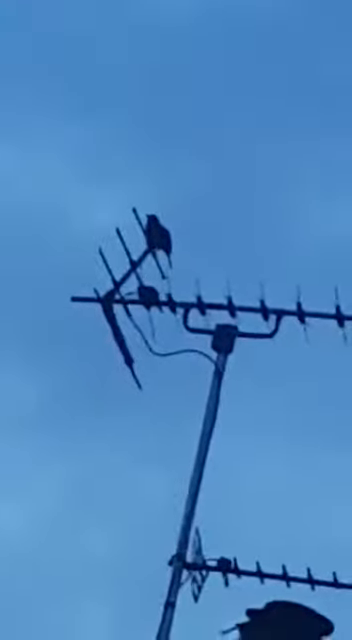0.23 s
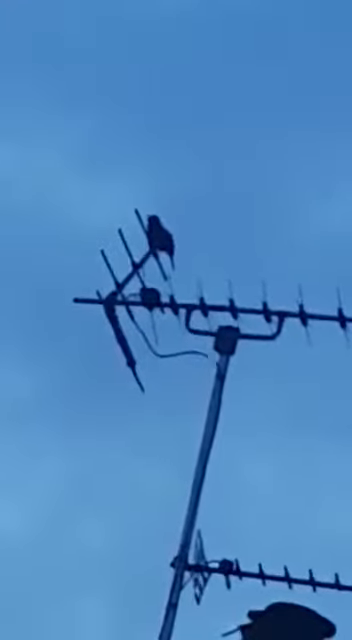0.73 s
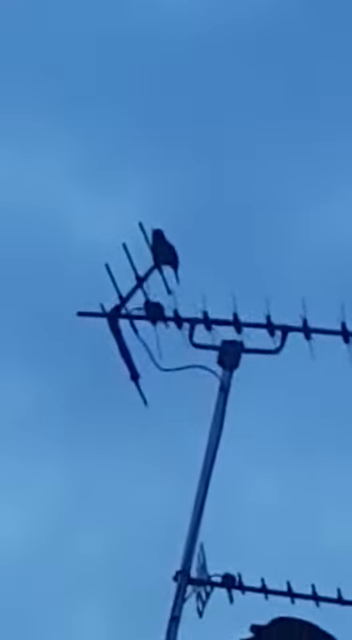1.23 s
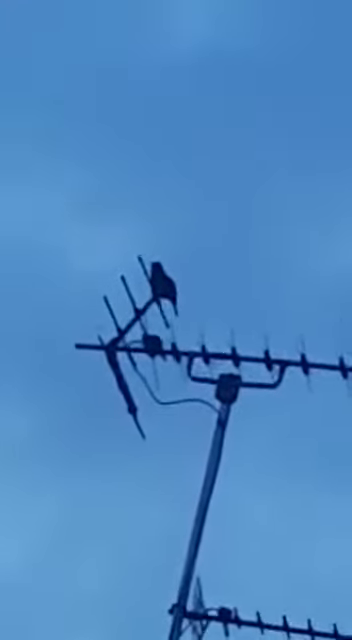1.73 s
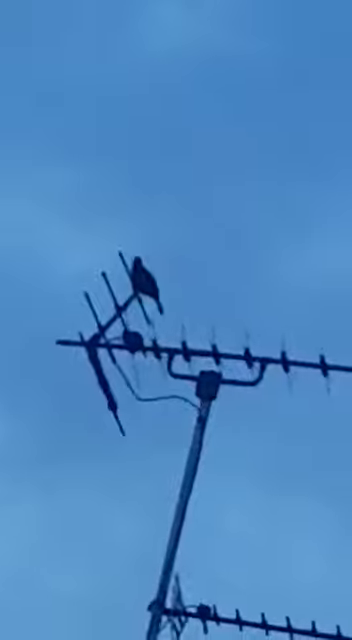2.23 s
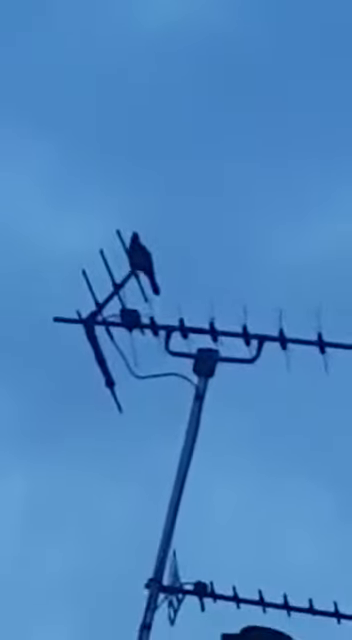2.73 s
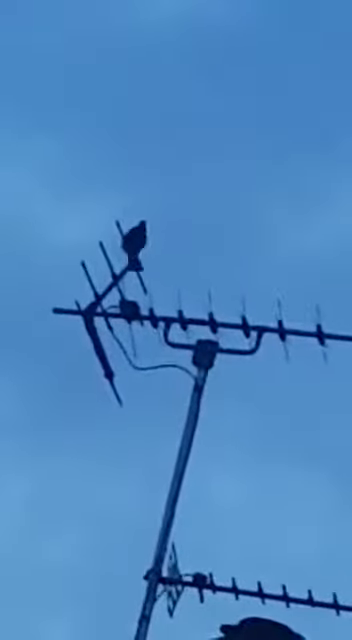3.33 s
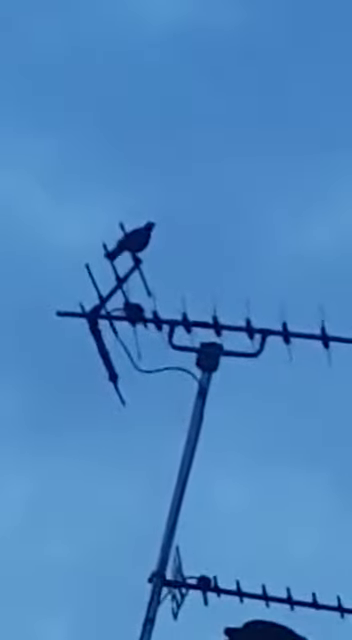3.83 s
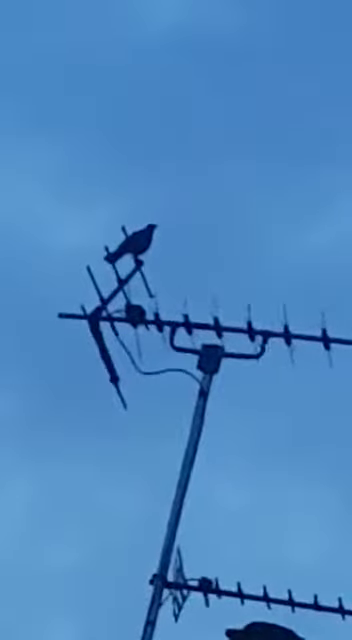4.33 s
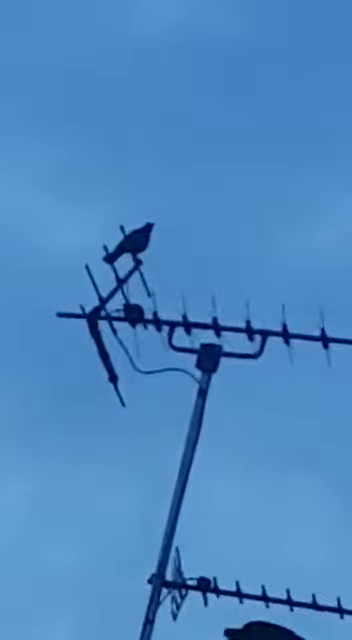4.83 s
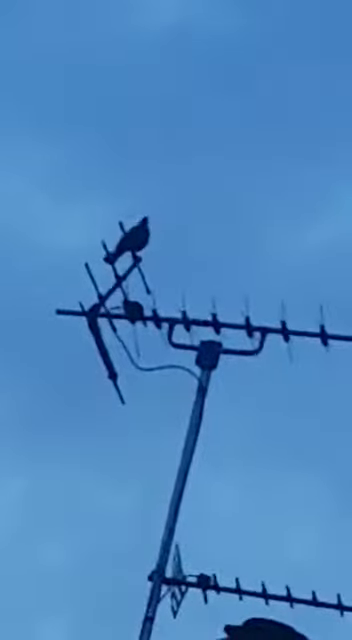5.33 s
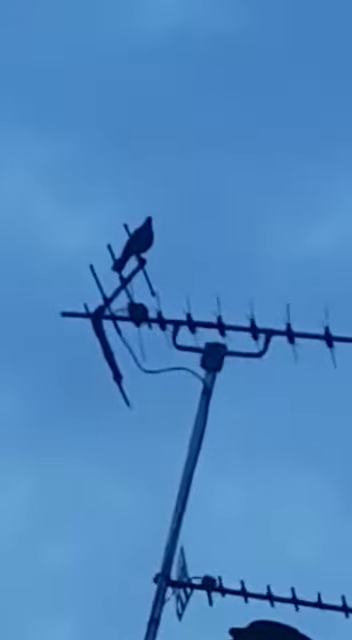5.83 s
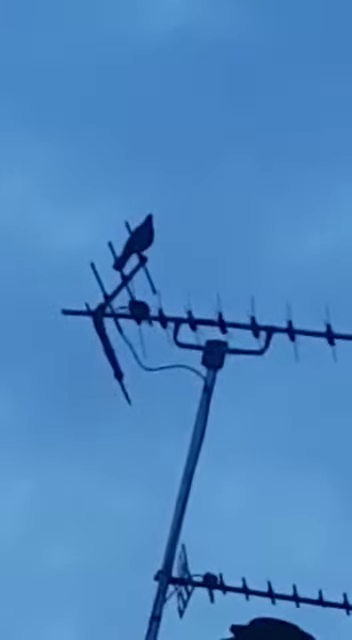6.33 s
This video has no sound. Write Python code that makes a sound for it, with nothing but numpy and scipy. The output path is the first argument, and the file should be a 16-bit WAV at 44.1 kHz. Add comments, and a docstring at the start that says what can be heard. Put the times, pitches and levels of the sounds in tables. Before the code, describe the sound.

Outdoors at dawn, a blackbird on a roof aerial sings clear, sliding fluted whistles, then thin buzzes, a sharp high note, harsh rasps and a faint high twitter. After a short pause a new mellow phrase begins. House walls return smeared echoes, a distant bird answers briefly, and very quiet traffic rumble and a wavering low hum lie beneath. One soft knock touches the microphone early on.

```python
"""The wash of a town and a faint low hum come first; half a second in, a blackbird on a roof aerial sings at dawn.
Its fluted notes give way to a thin high twitter, a pause and a new phrase: unsteady whistles swept in pitch.
House walls throw the song back as smeared echoes; a far bird, some gardens away, answers with short level notes.
The town is shaped noise, the hum one wavering tone, and one soft knock comes from a hand at the microphone.
Two microphone ports hear it in stereo, with a hollow in the treble and a limit at the top."""
import sys
import numpy as np
from scipy import signal
from scipy.fft import rfft, irfft
from scipy.io import wavfile
from scipy.ndimage import uniform_filter1d

SR = 44100
rng = np.random.default_rng(int(sys.argv[2]) if len(sys.argv) > 2 else 0)


def digitize_waveform(pressure):
    """Quantize a signal to 16-bit integers and store it at the path in sys.argv[1].

    Rows of a 2-D input are taken as channels; values are limited to [-1, 1].
    """
    field = np.atleast_2d(pressure).T
    bounded = np.clip(field, -1, 1)
    quanta = np.round(bounded * 32767).astype(np.int16)
    wavfile.write(sys.argv[1], SR, quanta)


N = 290178


def amp(db):
    """Decibels to amplitude."""
    return 10 ** (np.asarray(db) / 20)


def evened(x):
    """Scales a signal to rms 1 over all its channels."""
    return x / np.sqrt(np.mean(x ** 2) + 1e-20)


def read(points, hz):
    """A table read on a log-frequency axis."""
    f, value = np.transpose(points)
    return np.interp(np.log(hz + 1), np.log(f + 1), value)


def add(mix, s, sound):
    """Lays a sound into the mix at s seconds, cut off where the mix ends."""
    part = mix[round(s * SR):][:len(sound)]
    part += sound[:len(part)]


def drift(size, hz):
    """Smooth chance of about rms 1; its spectrum fades out around hz."""
    f = np.fft.rfftfreq(size + SR, 1 / SR)
    spectrum = rfft(rng.standard_normal(size + SR)) * np.exp(-(f / hz) ** 2)
    return evened(irfft(spectrum))[:size]


def panned(pair, side):
    """Tilts each band to the left or right."""
    side_db = read(side, np.fft.rfftfreq(N, 1 / SR))
    return irfft(rfft(pair) * amp(np.array([side_db, -side_db]) / 2), N)


def dipped(x, dip):
    """A bell-shaped hollow in the spectrum."""
    centre_hz, width_hz, depth_db = dip
    hz = np.fft.rfftfreq(N, 1 / SR)
    return irfft(rfft(x) * amp(depth_db * np.exp(-((hz - centre_hz) / width_hz) ** 2)), N)


# spectrum of the distant traffic: [f/Hz, relative level/dB per Hz]
TRAFFIC_SPECTRUM = [(15, -43), (25, -9.5), (58, 0), (224, -5.5), (256, -7), (289, -9), (399, -10),
                    (457, -15), (589, -13), (842, -12.5), (964, -10), (1240, -13.5), (1450, -16.5),
                    (1880, -45.5), (3190, -120)]
# traffic over time, before the trims in town(): [t/s, rumble level/dB, wash level/dB]
TRAFFIC_LEVEL = [(0.0, -66, -66), (0.88, -60, -62), (1.43, -62, -62), (2.36, -60, -62), (4.16, -63, -66),
                 (5.0, -64, -65), (5.52, -72, -63), (6.07, -69, -61), (6.58, -72, -64)]
# spectrum of the faint hiss on top: [f/Hz, relative level/dB per Hz]
HISS_SPECTRUM = [(820, -30.5), (1400, -7.5), (2070, -13), (2200, -16.5), (2750, -12.5), (3570, -23.5),
                 (4500, -23), (5130, -28.5), (15500, -24.5)]
HISS_DB = -68.5
# likeness of the two ports: [f/Hz, left-right correlation]
TOWN_SAME = [(60, 0.91), (180, 0.8), (550, 0.76), (1650, 0.22), (4970, 0), (15000, 0.022)]
# lean of the town to one port: [f/Hz, left minus right level/dB]
TOWN_SIDE = [(60, -1.5), (180, -2), (550, 0), (1650, -5), (4970, -1), (15000, 0.5)]


def town(rumble_db=-.8, wash_db=1.2):
    """Distant traffic: a lumpy rumble and a smooth wash, under steady faint hiss."""
    hz, t = np.fft.rfftfreq(N, 1 / SR), np.arange(N) / SR
    a, b = rfft(rng.standard_normal((2, N)))
    same = np.clip(read(TOWN_SAME, hz), -1, 1)
    noise = np.array([a, same * a + np.sqrt(1 - same ** 2) * b])
    # the rumble lies below about 320 Hz, the hiss above about 1400 Hz, the wash between
    low = 1 / (1 + (hz / 320) ** 6)
    high = 1 / (1 + (1400 / (hz + 1)) ** 12)
    traffic = noise * amp(read(TRAFFIC_SPECTRUM, hz)) * np.sqrt(1 - high)
    s, rumble_curve, wash_curve = np.transpose(TRAFFIC_LEVEL)
    rumble = evened(irfft(traffic * low, N)) * amp(np.interp(t, s, rumble_curve) + rumble_db)
    wash = evened(irfft(traffic * (1 - low), N)) * amp(np.interp(t, s, wash_curve) + wash_db)
    hiss = evened(irfft(noise * amp(read(HISS_SPECTRUM, hz)) * high, N)) * amp(HISS_DB)
    return panned(rumble + wash + hiss, TOWN_SIDE)


HUM_HZ, HUM_DB = 259, -69.5  # centre of the wavering pitch; level before its fade and waver


def hum(waver=.0057, waver_db=2.5):
    """A far machine drones on one tone, wavering in pitch (share) and level."""
    phase = 2 * np.pi * np.cumsum(HUM_HZ * (1 + waver * drift(N, 7.9))) / SR
    # the drone swells slightly, then sinks away
    fade_db = np.interp(np.arange(N) / SR, [0, 3, 6], [-.5, 2.5, -8])
    return np.sqrt(2) * amp(HUM_DB + fade_db + waver_db * drift(N, 4)) * np.sin(phase)


BUMP_S, BUMP_DB = .825, -41  # start, and level before the decay


def bump(decay_s=.0081, body_hz=78, body_db=-2, ring_s=.02):
    """One soft knock of a hand at the microphone: a dull noise tap and a short, decaying low tone."""
    t, out = np.arange(SR // 6) / SR, np.zeros(N)
    tap_band = signal.butter(1, [90, 300], "band", fs=SR, output="sos")
    tap = signal.sosfilt(tap_band, rng.standard_normal(len(t)))
    tap = evened(uniform_filter1d(tap, size=45)) * np.exp(-t / decay_s)
    thud = amp(body_db) * np.sin(2 * np.pi * body_hz * t) * np.exp(-t / ring_s)
    add(out, BUMP_S, amp(BUMP_DB) * (tap + thud))
    return out


# overtones of the fluted and of the thin, open-beaked voice: [multiple of the pitch, level/dB]
FLUTE_TONE = [(1, -1.5), (2, -44.5), (3, -43.5), (4, -79), (5, -47), (6, -47.5)]
THIN_TONE = [(1, -3.5), (2, -21.5), (3, -27)]


def syrinx(hz, db, tone, jitter=.003, flutter_db=1.0, coding_db=-46, overtone_db=4):
    """An unsteady whistle: jittering pitch, flickering overtones, a little coding noise around the tone."""
    size = len(hz)
    hz = hz * (1 + jitter * drift(size, 200))
    phase = 2 * np.pi * np.cumsum(hz) / SR
    wave = amp(coding_db) * signal.lfilter([1], [1, -.3], rng.standard_normal(size))
    for k, level in tone:
        flicker = overtone_db * drift(size, 36) * (k != 1)  # the fundamental stays steady
        audible = k * hz < SR / 2
        wave += np.sqrt(2) * amp(level + flicker) * audible * np.sin(k * phase)
    edges = signal.windows.tukey(size, min(1, .006 * SR / size))
    return wave * amp(db + flutter_db * drift(size, 100)) * edges


# the far bird's notes, level before the overtone weights: [t/s, length/s, f/Hz, level/dB]
FAR_NOTES = [(4.013, 0.061, 2784, -63.5), (4.152, 0.049, 2224, -60), (4.24, 0.037, 2240, -63),
             (4.274, 0.062, 2768, -61), (5.175, .06, 2235, -67.5), (5.33, 0.065, 2230, -64.5)]


def far_bird():
    """Short level whistles from some gardens away."""
    song = np.zeros(N)
    for s, length, hz, db in FAR_NOTES:
        add(song, s, syrinx(np.full(round(length * SR), hz), db, FLUTE_TONE, jitter=.014))
    return song


# echoes off the roof and house walls: [delay t/s, level/dB]
WALLS = [(.007, -17.5), (.052, -22.5), (.098, -16), (.112, -19.5), (.192, -20.5), (.3, -36)]
# dying away of the scattered tail: [f/Hz, t60/s]
STREET_T60 = [(1500, 2.64), (2500, 1.105), (4000, 2.33), (7000, 0.87), (14000, 0.13)]
# lean of the echoes to one port: [f/Hz, left minus right level/dB]
STREET_SIDE = [(2000, -7), (2800, -6), (4000, -0.5), (10000, 6)]


def street(x, tail_db=-15, build_s=.025, scatter=.14):
    """Distinct, slightly smeared wall echoes and a thin tail scattered by roofs and trees."""
    t = np.arange(SR + SR // 2) / SR
    hits = rng.random((2, len(t))) < 2000 / SR  # about 2000 reflections per second
    taps = rng.standard_normal((2, len(t))) * hits
    hz, s, bands = signal.stft(taps, SR, nperseg=256)
    decay = amp(-60 * s / read(STREET_T60, hz)[:, None])
    tail = signal.istft(bands * decay * (1 - np.exp(-s / build_s)), SR, nperseg=256)[1]
    tail *= amp(tail_db) / np.linalg.norm(tail[0])
    for delay, db in WALLS:
        for side in tail:
            echo = scatter * rng.standard_normal(1500) * np.exp(-t[:1500] / .006)
            echo[0] = 1
            # rough brick dulls the echo
            dull = uniform_filter1d(echo / np.linalg.norm(echo), size=3, mode="constant")
            add(side, delay, amp(db) * dull)
    return panned(signal.fftconvolve(x[None], tail, axes=1)[:, :N], STREET_SIDE)


# the roof's reflection cancels parts of the direct sound: [f/Hz, width/Hz, level/dB]
ROOF_NOTCHES = [(2880, 190, -11), (3720, 260, -5)]
# phase of the bird at the two ports: [f/Hz, lead of the left/rad]
BIRD_LEAD = [(1800, -.4), (2200, .2), (2600, 1.1), (2900, 1.7), (3700, -1.2), (5200, .4), (7000, 1.1)]
# lean of the bird to one port: [f/Hz, left minus right level/dB]
BIRD_SIDE = [(1800, -2), (2300, -4), (2850, -2), (3650, 11), (4400, 1), (5200, 0), (6800, 5), (13000, 9)]


def direct(x):
    """The straight path from the aerial to the two microphone ports."""
    for notch in ROOF_NOTCHES:
        x = dipped(x, notch)
    lead = read(BIRD_LEAD, np.fft.rfftfreq(N, 1 / SR))
    turned = rfft(x) * np.exp(.5j * np.array([lead, -lead]))
    return panned(irfft(turned, N), BIRD_SIDE)


ONSET_DB, FALL_ATTACK_S = -12, .013  # fluted notes swell from this far down; swell time of a fall
RELEASE_S, RELEASE_DB, RELEASE_SAG = .004, -7, .045  # as the pressure goes, level and pitch (share) drop


def blown(t, hz, db, attack_s):
    """One push of air: the note swells in, holds, and sags in pitch and level as it is let go."""
    letting_go = np.exp((t - t[-1]) / RELEASE_S)
    swell_db = ONSET_DB * np.exp((t[0] - t) / attack_s)
    return hz * (1 - RELEASE_SAG * letting_go), db + swell_db + RELEASE_DB * letting_go


# notes that bow up and come down, level before swell and release: [start t/s, top t/s, end t/s,
# start f/Hz, top f/Hz, end f/Hz, bow from 1 pointed to 2.5 rounded, level/dB, attack/s]
ARCHES = [ (1.615, 1.635, 1.68, 1910, 1955, 1882, 1.5, -33, .024),
          (1.754, 1.785, 1.846, 2030, 2150, 1720, 1.8, -30, .005),
          (2.631, 2.633, 2.65, 3650, 3650, 1900, 1.4, -46, .002),
          (4.147, 4.16, 4.187, 1944, 2284, 1830, 1.2, -56, .008),
          (4.193, 4.201, 4.202, 2200, 6300, 6300, 1, -44.5, .001),
          (4.2, 4.22, 4.232, 6400, 7550, 7560, 2.5, -54, .001),
          (4.356, 4.358, 4.377, 7460, 7460, 3040, 1.4, -55, .001),
          (5.462, 5.495, 5.502, 2500, 3000, 2980, 1, -52, .005),
          (5.48, 5.6, 5.75, 1470, 1605, 1530, 1.2, -55.5, .015),
          (5.575, 5.6, 5.622, 1580, 1615, 1590, 2, -44, .012),
          (5.932, 5.962, 5.995, 2240, 2340, 1997, 2.4, -25, .004),
          (5.992, 6.03, 6.053, 1997, 2250, 2225, 2, -28, .011)]


def arch(start, top, end, start_hz, top_hz, end_hz, bow, db, attack_s):
    """Pitch and level of a note that bows up to its top and down again."""
    t = np.arange(start, end, 1 / SR)
    away = np.interp(t, [start, top, end], [1, 0, 1]) ** bow
    foot_hz = np.where(t < top, start_hz, end_hz)
    return blown(t, top_hz + (foot_hz - top_hz) * away, db, attack_s)


# notes that climb to a top and sink to rest, levels before swell and release: [start t/s, top t/s, end t/s,
# top f/Hz, resting f/Hz, sinking time/s, shoulder from 1 sharp to 2 round, start level/dB, end level/dB]
FALLS = [ (.759, .923, 1.023, 2920, 2240, .09, 1.7, -31, -28),
         (1.332, 1.346, 1.45, 2560, 1950, .048, 1.3, -28, -33.5),
         (2.494, 2.495, 2.638, 4880, 3630, .029, 1.9, -31, -41.5),
         (3.178, 3.185, 3.395, 7520, 6200, .11, .9, -53, -47.5),
         (3.19, 3.192, 3.36, 2650, 2300, .06, 1.5, -61, -65),
         (3.452, 3.453, 3.497, 5830, 5440, .012, 1, -53, -55),
         (5.675, 5.683, 5.803, 2203, 1675, .048, 2, -30.5, -40),
         (5.685, 5.69, 5.74, 2580, 2250, .035, 2, -48, -57)]


def fall(start, top, end, top_hz, rest_hz, sink_s, shoulder, start_db, end_db):
    """Pitch and level of a note whose tension peaks at the top and relaxes towards rest."""
    t = np.arange(start, end, 1 / SR)
    tension = np.exp(-abs((t - top) / sink_s) ** shoulder)
    level = np.linspace(start_db, end_db, len(t))
    return blown(t, rest_hz + (top_hz - rest_hz) * tension, level, FALL_ATTACK_S)


# notes that settle low, then leap high, levels before swell and release: [start t/s, leap t/s, end t/s,
# start f/Hz, low f/Hz, high f/Hz, low level/dB, high level/dB, attack/s]
LEAPS = [ (1.941, 2.012, 2.171, 2290, 2050, 2410, -32.5, -26, .002),
         (6.205, 6.334, 6.407, 1640, 1900, 2500, -33.8, -28.8, .018),
         (6.469, 6.539, 6.579, 1860, 1965, 2560, -34, -29.5, .008)]
SETTLE_S, LEAP_S = .019, .005  # how fast the pitch finds the low tone, and crosses to the high one
HIGH_BOW_HZ = 30  # the high tone bows from this far below its pitch to this far above in its middle


def leap(start, leap_at, end, start_hz, low_hz, high_hz, low_db, high_db, attack_s):
    """Pitch and level of a note that holds a low tone and jumps to a louder, gently bowed high one."""
    t = np.arange(start, end, 1 / SR)
    up = 1 / (1 + np.exp((leap_at - t) / LEAP_S))
    high = high_hz + HIGH_BOW_HZ * (1 - 2 * np.interp(t, [leap_at, end], [-1, 1]) ** 2)
    low = low_hz + (start_hz - low_hz) * np.exp((start - t) / SETTLE_S)
    return blown(t, low + (high - low) * up, low_db + (high_db - low_db) * up, attack_s)


# start and end of the open-beaked stretch, where notes are thin: [t/s, t/s]
OPEN_BEAK = (2.2, 4.5)


def fluted_notes():
    """Arches, falls and leaps: nearly pure, but thin with the beak open, with more coding noise around them."""
    song = np.zeros(N)
    for shape, notes in (arch, ARCHES), (fall, FALLS), (leap, LEAPS):
        for row in notes:
            pitch, level = shape(*row)
            if OPEN_BEAK[0] < row[0] < OPEN_BEAK[1]:
                note = syrinx(pitch, level, THIN_TONE, jitter=.004, coding_db=-27)
            else:
                note = syrinx(pitch, level, FLUTE_TONE, jitter=.0035, flutter_db=1.1, coding_db=-45.5,
                              overtone_db=3)
            add(song, row[0], note)
    return song


def trill(start, end, crest, hz0, hz1, swing_hz, rate, db0, db1, dip_db,
          cusp=.18, lean=.15, uneven=.15, narrow=.3, upstroke_db=0):
    """Pitch jumps to sharp crests and slides into round troughs (a negative swing inverts it), unevenly."""
    t = np.arange(start, end, 1 / SR)
    angle = 2 * np.pi * rate * (t - crest)
    # widest in mid-trill
    width = 1 - narrow * np.linspace(-1, 1, len(t)) ** 2 + uneven * drift(len(t), 30)
    swing = (np.cos(angle) + cusp * np.cos(2 * angle) - lean * np.sin(2 * angle)) * width
    db = np.linspace(db0, db1, len(t)) - dip_db * swing - upstroke_db * np.sin(angle)
    return np.linspace(hz0, hz1, len(t)) + swing_hz * swing, db


# slow fluted trills: [start t/s, end t/s, first crest t/s, centre f/Hz at start, centre f/Hz at end,
# nominal swing/Hz, swings per s, start level/dB, end level/dB, dip/dB on each crest], before the soft ends
WARBLES = [ (.523, .694, .534, 1980, 1975, 235, 31, -46.5, -38.5, -.5),
           (1.085, 1.265, 1.098, 1805, 1788, 55, 31.7, -37.8, -37.8, -3.5),
           (1.679, 1.757, 1.682, 2040, 2200, 390, 46, -37, -35.5, 2),
           (5.893, 5.938, 5.9, 2240, 2240, 40, 68, -36.5, -29, -4)]
WARBLE_ENDS_DB = -5  # a warble is softer as it starts and stops


def warbles():
    """The whistle swings slowly about its pitch, in the fluted voice."""
    song = np.zeros(N)
    for row in WARBLES:
        pitch, level = trill(*row, cusp=.27)
        level = level + WARBLE_ENDS_DB * np.linspace(-1, 1, len(level)) ** 4
        add(song, row[0], syrinx(pitch, level, FLUTE_TONE, jitter=.0068, flutter_db=2.2, coding_db=-38))
    return song


# three high pairs, then a long low one and its fainter echo off a wall; middle pitch,
# level before dips and soft ends: [start t/s, length/s, f/Hz, level/dB]
BUZZES = [(2.255, .024, 4810, -43), (2.283, .022, 4920, -42), (2.339, .022, 5030, -45.5),
          (2.363, .026, 5170, -43), (2.42, .026, 5130, -47.5), (2.449, .03, 5170, -44),
          (3.47, .103, 3780, -41.5), (3.56, .1, 3800, -50.5)]
BUZZ_SWING_HZ, BUZZ_PER_S, BUZZ_DIP_DB = 170, 140, 4.5
BUZZ_RISE_HZ_PER_S, BUZZ_ENDS_DB = 2500, -12  # a buzz creeps upward and is loudest in its middle


def buzz(start, length, hz, db):
    """Pitch and level of a very fast, shallow trill that swells and fades."""
    rise = BUZZ_RISE_HZ_PER_S * length / 2
    pitch, level = trill(start, start + length, start, hz - rise, hz + rise,
                         BUZZ_SWING_HZ, BUZZ_PER_S, db, db, BUZZ_DIP_DB)
    return pitch, level + BUZZ_ENDS_DB * np.linspace(-1, 1, len(level)) ** 2


def buzzes():
    """The buzzes, and the echo of the last, in the thin voice."""
    song = np.zeros(N)
    for row in BUZZES:
        add(song, row[0], syrinx(*buzz(*row), THIN_TONE, jitter=.005, coding_db=-27))
    return song


CREST_S = .004  # a twitter or rasp reaches its first crest this soon
# high zigzag trills, level before the dips: [start t/s, end t/s, centre f/Hz at start, centre f/Hz at end,
# nominal swing/Hz, level/dB]
TWITTERS = [ (3.746, 3.804, 7400, 6540, 1150, -53.5), (3.814, 3.854, 7850, 7150, 1200, -54),
            (3.938, 3.996, 7300, 6750, 1150, -51), (4.011, 4.073, 8100, 5600, 1700, -53.5),
            (4.3, 4.359, 7140, 6840, -650, -53)]
TWITTER_PER_S, TWITTER_DIP_DB = 46.5, 2.5


def twitters():
    """The pitch zigzags widely, high up, in the thin voice."""
    song = np.zeros(N)
    for start, end, hz0, hz1, swing_hz, db in TWITTERS:
        zigzag = trill(start, end, start + CREST_S, hz0, hz1, swing_hz, TWITTER_PER_S,
                       db, db, TWITTER_DIP_DB, upstroke_db=-3)
        add(song, start, syrinx(*zigzag, THIN_TONE, jitter=.0074, coding_db=-22.5))
    return song


# overtones and undertones of the rasps: [multiple of the pitch, level/dB]
RASP_TONE = [(1 / 3, -31), (2 / 3, -12), (1, 0), (4 / 3, -15), (5 / 3, -24), (2, -17), (7 / 3, -24),
             (8 / 3, -25), (3, -24)]
# the nasal lead-in, a swelling rise: [start t/s, end t/s, start f/Hz, end f/Hz, start level/dB, end level/dB]
LEAD_IN = (2.815, 2.848, 4980, 5200, -63, -48)
# harsh zigzags, before the sides and dips: [start t/s, end t/s,
# centre f/Hz at start, centre f/Hz at end, level/dB]
RASPS = [ (2.849, 2.897, 5270, 4220, -45.5), (2.918, 2.961, 5520, 4130, -46),
         (2.984, 3.026, 5920, 4115, -44.5), (3.053, 3.095, 5740, 4120, -45),
         (3.158, 3.185, 4980, 5600, -55)]
# the two sides of the syrinx zigzag out of step: [lag/s, pitch ratio, level/dB]
RASP_SIDES = [(0, 1, -.4), (.005, .86, -9)]
RASP_SWING_HZ, RASP_PER_S, RASP_DIP_DB = 850, 58, 2.5


def rasps():
    """A nasal tone swells and breaks into a run of harsh, crossing zigzags, thick with undertones."""
    song = np.zeros(N)
    start, end, hz0, hz1, db0, db1 = LEAD_IN
    pitch, level = np.linspace((hz0, db0), (hz1, db1), round((end - start) * SR)).T
    add(song, start, syrinx(pitch, level, RASP_TONE, jitter=.004, coding_db=-18))
    for start, end, hz0, hz1, db in RASPS:
        for lag, ratio, side_db in RASP_SIDES:
            pitch, level = trill(start, end, start + CREST_S, hz0, hz1, RASP_SWING_HZ, RASP_PER_S,
                                 db, db, RASP_DIP_DB, cusp=.09, uneven=.2, upstroke_db=-1)
            voice = syrinx(pitch * ratio, level + side_db, RASP_TONE,
                           jitter=.03, flutter_db=1.5, coding_db=-16)
            add(song, start + lag, voice)
    return song


# the other side of the syrinx, under the loud high fall: [start t/s, top t/s, end t/s, top f/Hz,
# resting f/Hz, sinking time/s, shoulder, start level/dB, end level/dB]
SECOND_VOICE = (2.548, 2.549, 2.64, 2700, 2545, .01, 2, -35.5, -39.5)


def two_voiced(song, coupling=.45):
    """Both sides of the syrinx sound at once and modulate each other; the throat passes their sum tone."""
    second = np.zeros(N)
    voice = syrinx(*fall(*SECOND_VOICE), THIN_TONE[:1], jitter=.024, flutter_db=4, coding_db=-24)
    add(second, SECOND_VOICE[0], voice)
    throat = signal.butter(4, 2500, "high", fs=SR, output="sos")
    product = song * second / abs(second).max()
    return song + second + 2 * coupling * signal.sosfilt(throat, product)


def blackbird():
    """Fluted notes with the throat tuned to the fundamental, and an open-beaked twitter richer in overtones."""
    return two_voiced(fluted_notes() + warbles() + buzzes() + twitters() + rasps())


def scene():
    """The town, hum and knock, the far bird, and the blackbird heard straight and off the walls."""
    background = town() + hum() + bump()
    answer = far_bird()
    song = blackbird()
    return background + answer + street(song + answer) + direct(song)


# a hollow in the microphone's treble: [f/Hz, width/Hz, level/dB]
MIC_DIP = (9130, 830, -5)
EDGE_HZ = 15800


def record(dry):
    """The microphone's colour, then the recorder's band limit."""
    low_pass = signal.firwin(511, EDGE_HZ, window=("kaiser", 9), fs=SR)
    return signal.oaconvolve(dipped(dry, MIC_DIP), low_pass[None], "same")


dry = scene()
out = record(dry)
digitize_waveform(out)
```